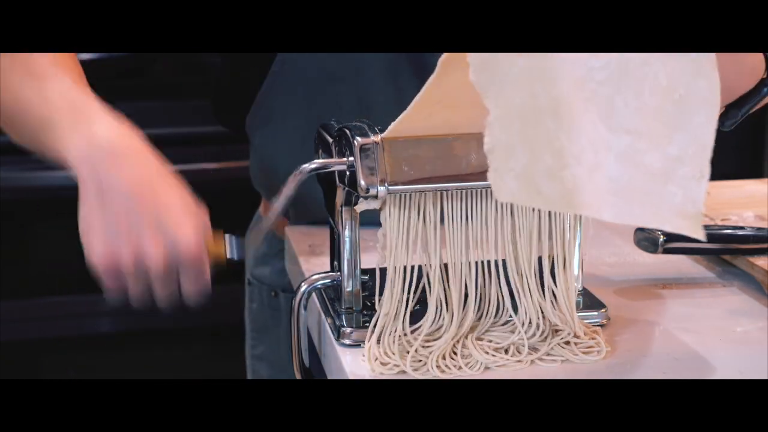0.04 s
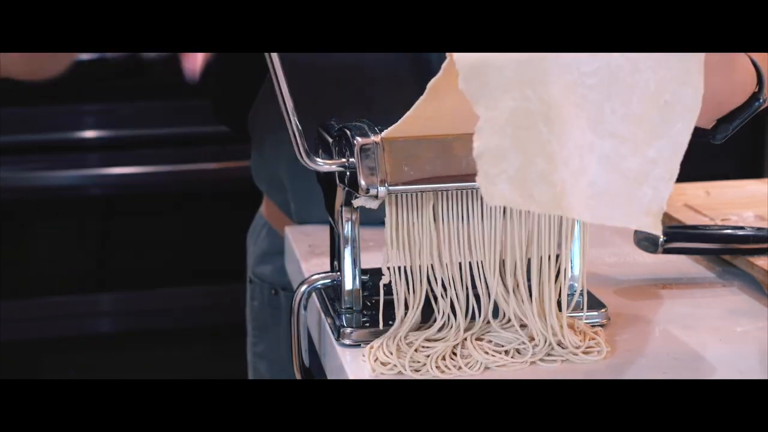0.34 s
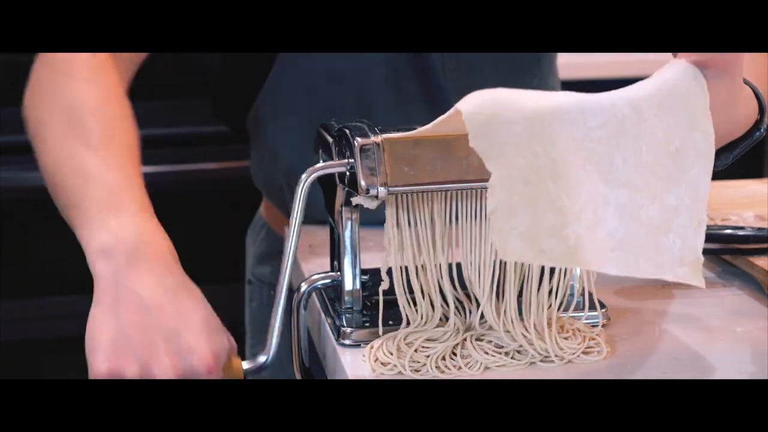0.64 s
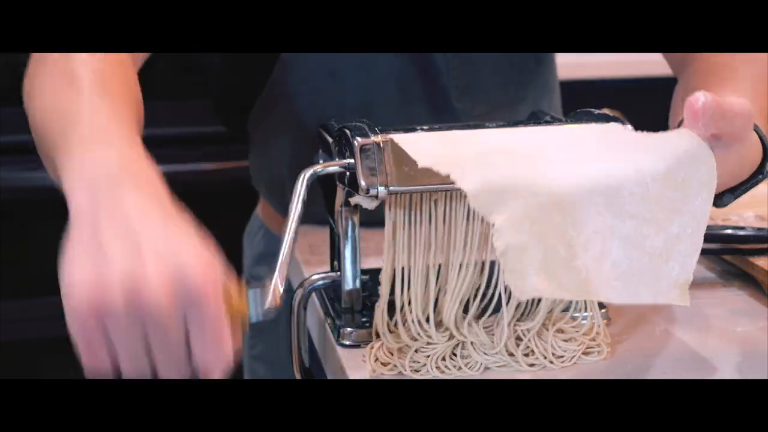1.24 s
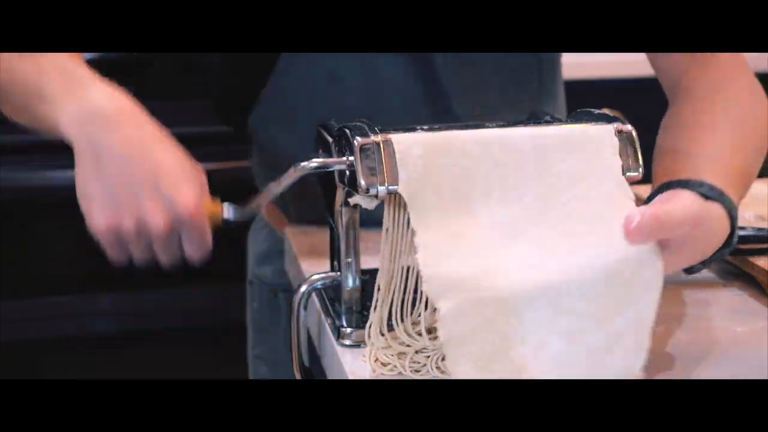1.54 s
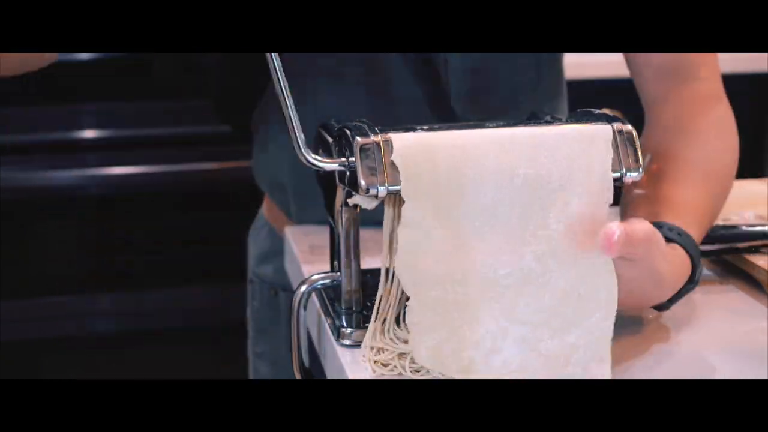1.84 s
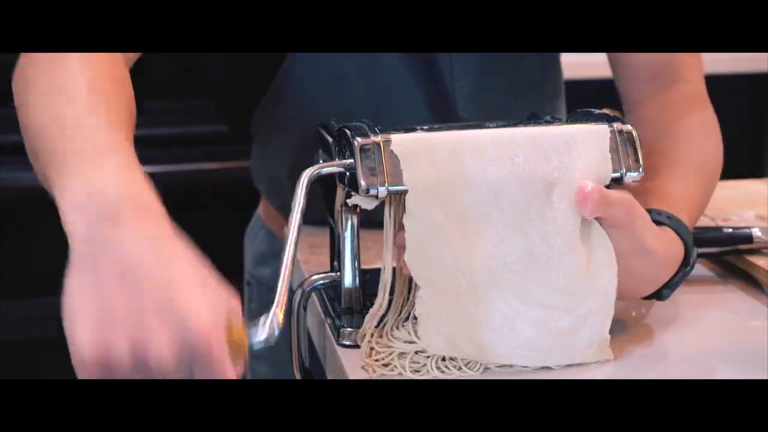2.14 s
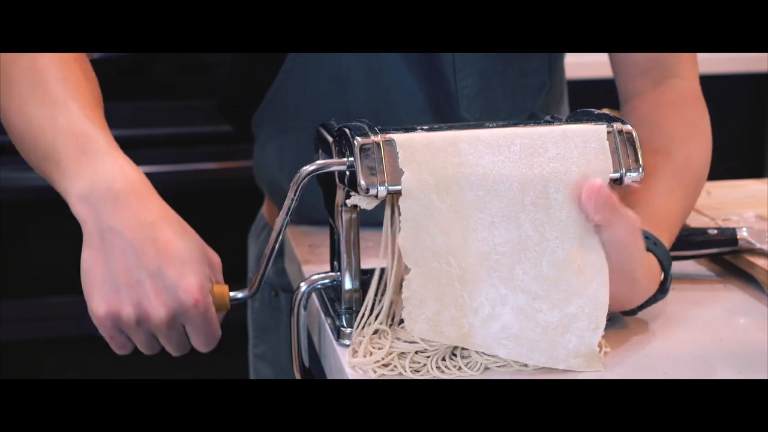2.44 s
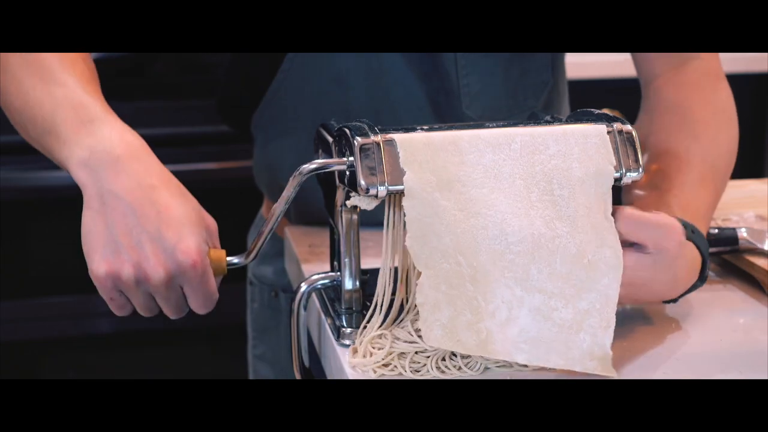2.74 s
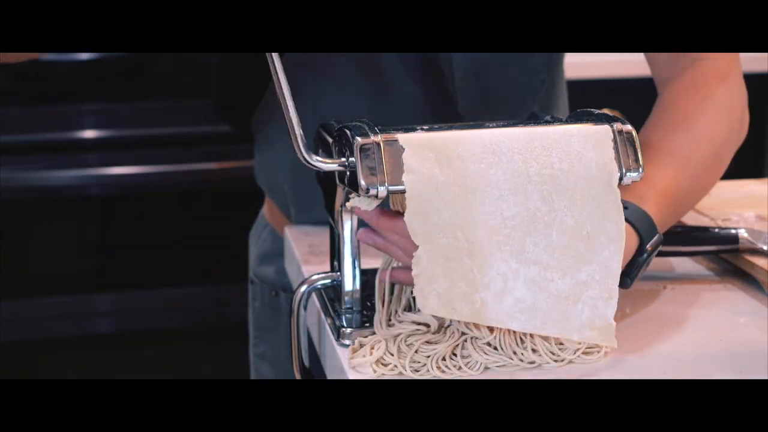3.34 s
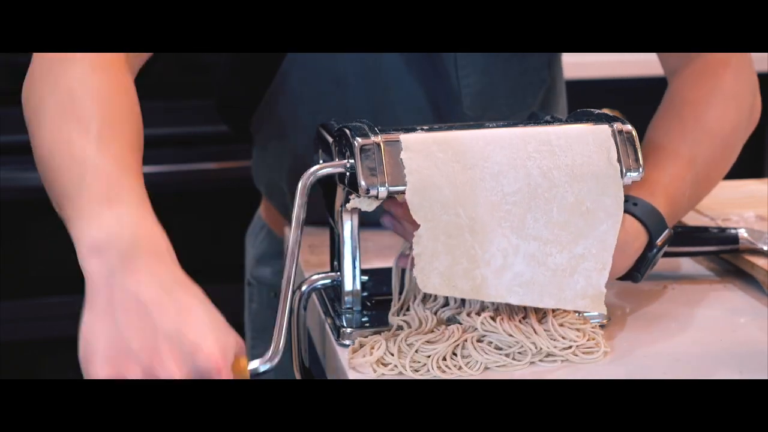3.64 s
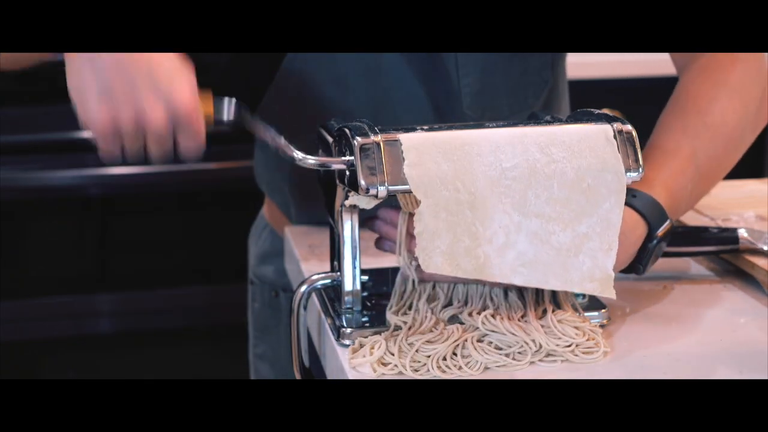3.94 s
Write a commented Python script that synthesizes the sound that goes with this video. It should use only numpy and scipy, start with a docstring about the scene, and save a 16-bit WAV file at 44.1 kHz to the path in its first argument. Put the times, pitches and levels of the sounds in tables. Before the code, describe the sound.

Gears of a steel pasta cutter rattle and clack unevenly, with light crank clinks.

```python
"""First you hear gears rumbling and knocking, close by: a hand-cranked steel pasta machine is cutting
a sheet of dough. The rollers ring, the dough hisses and ticks through the cutters, and the kitchen
counter booms under the load. The loose crank clinks in its socket and a dry bearing squeaks.
The hand rests briefly near 2.8 s, then turns the crank again."""
import sys
import numpy as np
from scipy import signal
from scipy.fft import rfft, irfft, next_fast_len
from scipy.io import wavfile
from scipy.ndimage import map_coordinates

SR = 44100
rng = np.random.default_rng(int(sys.argv[2]) if len(sys.argv) > 2 else 0)


def master(y):
    """Save y as 16-bit WAV."""
    cut = np.clip(np.atleast_2d(y).T, -1, 1)
    pcm = np.round(cut * 32767)  # scale
    wavfile.write(sys.argv[1], SR, pcm.astype(np.int16))


N = 4 * SR

# Levels in the tables are relative: the functions add an overall level for each sound.
# How loud each steady sound is over time: time_s, level_db
GEAR_EFFORT = [(0.0, -51), (0.22, -43.5), (0.34, -50), (0.6, -51.5), (0.79, -48), (0.93, -45.5),
               (1.14, -48), (1.29, -48.5), (1.51, -51), (1.88, -43), (2.03, -50.5), (2.22, -51),
               (2.39, -56.5), (2.71, -68.5), (2.96, -62), (3.12, -50), (3.27, -47.5), (3.33, -48),
               (3.5, -49), (3.64, -52.5), (3.87, -49.5), (4.0, -47)]
DOUGH_FEED = [(0, -61), (.2, -60), (.36, -62.5), (.47, -67), (.6, -62), (.72, -56), (.9, -66.5),
              (.99, -57.5), (1.22, -56.5), (1.38, -60), (1.56, -64), (1.68, -63), (1.8, -61.5),
              (1.95, -57.5), (2.04, -66), (2.17, -63), (2.33, -64.5), (2.55, -65), (2.63, -62.5),
              (2.73, -71.5), (2.86, -78), (3.0, -70.5), (3.12, -62.5), (3.23, -61.5), (3.39, -58.5),
              (3.45, -70), (3.66, -61.5), (3.73, -62), (3.88, -59.5), (4, -64.5)]
COUNTER_SWELLS = [(0, -54), (.08, -44), (.19, -66), (.28, -39.5), (.4, -55.5), (.54, -35), (.62, -50.5),
                  (.69, -43.5), (.8, -46), (.92, -56), (1.0, -49), (1.16, -48), (1.29, -36), (1.42, -47),
                  (1.66, -57), (1.8, -42), (1.93, -61), (2.1, -43), (2.33, -54.5), (2.42, -50), (2.55, -53),
                  (2.8, -64), (3.08, -63), (3.25, -48), (3.4, -51.5), (3.6, -39.5), (3.7, -46),
                  (3.86, -45.5), (4, -58)]

# Gear knocks and their five parts: start_s, casing_db, thud_db, frame_db, plate_db, clack_db
GEAR_KNOCKS = [(.033, -33, -29, -31.5, -35, -40.5), (.140, -50, -32.5, -35, -43, -69),
               (.187, -47, -34, -37.5, -48, -66), (.240, -39.5, -33, -26, -34, -44),
               (.307, -36, -41, -40, -45, -59), (.365, -33, -48, -37, -49.5, -69),
               (.568, -36.5, -33.5, -50, -36.5, -44.5), (.750, -25, -27, -42, -38.5, -38.5),
               (.796, -53, -30.5, -39.5, -46, -53), (.916, -42.5, -30, -35, -47.5, -72),
               (.972, -41, -27.5, -28.5, -45, -49.5), (1.038, -32, -38, -34, -43.5, -63),
               (1.099, -33.5, -50, -38, -44, -49.5), (1.279, -33, -34, -38, -35, -42),
               (1.467, -32, -28, -55, -45.5, -50), (1.773, -38, -29.5, -29, -38.5, -47),
               (1.849, -37.5, -63, -33, -48.5, -71), (1.992, -39.5, -36, -41.5, -42.5, -49),
               (2.072, -49, -36, -45, -56, -74), (2.078, -42, -51, -59, -43, -56),
               (2.154, -35.5, -35.5, -47.5, -37, -45), (2.39, -38, -31, -39.5, -45.5, -55.5),
               (2.512, -47.5, -51, -54, -58, -72), (2.569, -43.5, -35.5, -51, -58, -65),
               (3.161, -45, -39.5, -40, -51, -56), (3.235, -39, -38.5, -27.5, -41.5, -41.5),
               (3.324, -35, -50, -34.5, -47, -57.5), (3.402, -41, -50, -40, -40, -64),
               (3.475, -34.5, -46, -44, -40, -51), (3.549, -40, -39, -45.5, -49, -75),
               (3.624, -35.5, -34, -41, -37, -50.5), (3.818, -30, -30.5, -43, -47.5, -44.5),
               (3.893, -35.5, -59, -38, -47.5, -57), (3.984, -58, -52, -38, -51, -70)]
# Clinks of the crank: start_s, high_ring_db, low_ring_db
CRANK_CLINKS = [(0.0355, -30.5, -42), (0.2399, -34.5, -30.5), (0.493, -49, -50), (0.5048, -47, -52),
                (0.752, -28, -40.5), (1.2546, -39.5, -43.5), (1.2705, -41, -50), (1.28, -41.5, -42),
                (1.775, -48, -48), (1.9946, -34.5, -55), (2.013, -44, -53), (2.0469, -42, -50),
                (2.0775, -41, -49), (2.091, -37, -48.5), (2.0944, -34, -46), (2.1106, -42, -52.5),
                (3.478, -31.5, -44.5), (3.4974, -38, -49), (3.529, -45.5, -55), (3.556, -44, -54),
                (3.5696, -37.5, -47.5), (3.587, -38, -49), (3.606, -42, -48), (3.8177, -34.5, -48.5)]
# Dry ticks at the cutters: start_s, level_db, pitch_hz
CUTTER_TICKS = [(0.158, -34.5, 2720), (0.6285, -41, 3330), (0.871, -24.5, 2610), (1.447, -32, 2540),
                (1.5367, -37, 3140), (1.6327, -32.5, 2050), (1.7788, -27, 3070), (2.454, -45, 1640),
                (3.238, -30, 2020), (3.4057, -29.5, 2930), (3.8772, -38, 3700), (3.9848, -41, 1600)]
# Squeaks of the bearing: start_s, length_s, pitch_hz, level_db
BEARING_SQUEAKS = [(0.291, 0.015, 2875, -32.5), (0.309, 0.018, 2852, -31), (0.933, 0.022, 6940, -55),
                   (1.026, 0.024, 2760, -43.5), (3.936, .017, 3074, -41.5)]
# A squeak's tones at 1 to 5 times its pitch: level_db
SQUEAK_HARMONICS = [0, -15, -24, -29, -28]

# The notes each steel part rings with (a fade is the time to drop 60 dB): pitch_hz, level_db, fade_s
ROLLER_NOTES = [(1823, -6, .03), (2610, -2.5, 0.027), (2824, 1, 0.032), (2922, 3.5, 0.03), (3180, 0, 0.023),
                (3900, 1, 0.033), (4520, -2.5, .025), (5210, -2, 0.03), (6230, -3.5, 0.021),
                (7100, -1, 0.0099)]
FRAME_NOTES = [(236, 0, .11), (262, -8, .08), (311, -7, .25), (357, -5, .14), (432, -9, .08)]
CASING_NOTES = [(482, -6, .07), (615, -2, .035), (707, 0, .085)]
PLATE_NOTES = [(950, -21, 0.055), (1056, -6, 0.12), (1136.6, 0, 0.049), (1294, -20, 0.044)]
CRANK_HIGH_NOTES = [(8880, -6, .07), (10310, -1, .055), (10650, -4, .03), (11450, 2, .03), (12400, -2, .03),
                    (13970, 0, .04), (15150, -4, .04)]
CRANK_LOW_NOTES = [(3880, -2, .04), (4450, 1, .045), (5240, -5, .05), (6300, -5, .03), (6930, -1, .05)]

# The colour of each noise, or how strong it is from bass to treble: pitch_hz, level_db
GEAR_COLOUR = [(40, -41.5), (85, 6.5), (125, 10), (180, 0.5), (240, 2.5), (280, -0.5), (350, 5.5),
               (420, -4.5), (480, 0.5), (620, -7), (705, 0), (790, -18), (950, -11.5), (1100, -5.5),
               (1300, -22.5), (2200, -23.5), (5000, -79)]
DOUGH_COLOUR = [(500, -6), (1400, 7.5), (2300, -3.5), (3000, 5), (4000, 6.5), (5600, 1), (7000, 4),
                (7900, -1.5), (8700, 3), (11500, 1), (13000, 1), (15800, -3.5)]
COUNTER_COLOUR = [(25, -33), (42, -16), (53, -9.5), (61, -5), (69, -17), (80, -27), (120, -7), (200, -62.5)]
KITCHEN_COLOUR = [(20, -27), (40, 8), (60, -14), (120, -6.5), (180, -6.5), (350, -3), (550, -8.5),
                  (760, -4), (1000, -16.5), (1800, -23.5), (4000, -33), (9000, -25), (15500, -26)]
THUD_COLOUR = [(40, -40), (70, -18.5), (100, -4.5), (125, 1), (160, -3.5), (220, -15), (500, -31),
               (1500, -69)]
FRAME_COLOUR = [(80, -24), (170, -14), (240, -10), (400, 0), (500, -9), (700, -15), (1500, -72.5)]
CASING_COLOUR = [(250, -19), (480, -12.5), (720, -0.5), (800, -18), (1000, -13.5), (2000, -51.5)]
PLATE_COLOUR = [(600, -32.5), (850, -2.5), (1130, -1), (1300, -7), (1800, -12), (2300, -24.5), (4000, -32)]
CLACK_COLOUR = [(600, -47), (1500, -10), (2300, 4), (3100, 9), (4400, 11), (6500, -8), (8000, -5.5),
                (15000, -34)]
CRANK_HIGH_COLOUR = [(4000, -23), (8300, -10), (10300, 6), (10900, -8), (11500, 8), (13000, -3.5),
                     (14000, 2), (14700, -22), (15800, 0)]
CRANK_LOW_COLOUR = [(800, -6), (1800, 8), (4400, 7), (7200, 7), (8200, -3), (12000, -41)]
RASP_COLOUR = [(700, -15), (1900, 13), (2900, -13), (3700, 4), (4500, 8), (7000, 1), (12000, 6),
               (15800, -17)]
AFTER_RING_COLOUR = [(1500, 7), (2850, -9.5), (6000, -13.5), (15000, -17)]
# The colour of a tick around its own pitch: pitch_ratio, level_db
TICK_COLOUR = [(.2, -20), (.71, -7), (1, 0), (1.39, -11), (2.26, -17), (4, -32)]

# How long the kitchen's echo lasts: pitch_hz, fade_s
ECHO_FADES = [(100, 0.31), (700, 0.78), (3000, 0.19), (12000, 0.12)]

HIT_TIME = np.arange(11000) / SR  # seconds since a hit began


def amp(db):
    """Turn decibels into a number to multiply a sound by."""
    return 10 ** (np.asarray(db) / 20)


def unit(x):
    """Scale a sound to an average strength (rms) of 1."""
    return x / np.sqrt(np.mean(x ** 2) + 1e-20)


def at_pitch(rows, hz):
    """Read between (pitch_hz, value) rows, giving each octave equal room."""
    pitches, values = np.transpose(rows)
    return np.interp(np.log(hz + 1), np.log(pitches + 1), values)


def curve(rows):
    """Join (time_s, value) rows with straight lines, one value per sample."""
    return np.interp(np.arange(N) / SR, *np.transpose(rows))


def wobble(rate):
    """A smooth wander through `rate` random values a second."""
    return map_coordinates(rng.standard_normal(2048), [np.arange(N) * rate / SR], mode="wrap")


def coloured(x, colour):
    """Give a sound this balance of bass and treble, at strength 1."""
    size = len(x)
    gains = amp(at_pitch(colour, np.fft.rfftfreq(size, 1 / SR)))
    cepstrum = irfft(np.log(gains), size)
    # Folding this onto its first half makes the filter ring after a hit, not before.
    cepstrum[1:size // 2] *= 2
    cepstrum[size // 2 + 1:] = 0
    return unit(irfft(rfft(x) * np.exp(rfft(cepstrum)), size))


def add(track, start_s, sound):
    """Mix a sound into the track at start_s."""
    i = max(0, round(start_s * SR))
    track[i:i + len(sound)] += sound[:N - i]


def fade(t, fade_s):
    """Die away by 60 dB every fade_s seconds."""
    return np.exp(-np.log(1000) * t / fade_s)


def burst(colour, rise_s, fade_s):
    """Many crowded notes struck together: noise that swells and dies."""
    noise = coloured(rng.standard_normal(len(HIT_TIME)), colour)
    return noise * np.minimum(HIT_TIME / rise_s, 1) * fade(np.maximum(HIT_TIME - rise_s, 0), fade_s)


def ring(notes, rise_s, spread_db=3, detune=.008):
    """Clear notes, struck a little differently every time; the load shifts their pitch slightly."""
    hz, db, fade_s = np.transpose(notes)[:, :, None]
    gain = amp(db + spread_db * rng.standard_normal(hz.shape))
    hz = hz * (1 + detune * rng.uniform(-1.23, 1, hz.shape))
    waves = np.sin(2 * np.pi * (hz * HIT_TIME + rng.random(hz.shape))) * fade(HIT_TIME, fade_s)
    chord = (gain * waves).sum(0) / np.sqrt(np.sum(gain ** 2) / 2)
    return chord * np.minimum(HIT_TIME / rise_s, 1)


def grains(rate, spread_db):
    """Tiny random clicks of uneven size, about `rate` a second."""
    clicks = (rng.random(N) < rate / SR) * rng.choice([-1, 1], N)
    return unit(clicks * amp(spread_db * np.clip(rng.standard_normal(N), -2, 2)))


def gear_rumble():
    """Small contacts of the turning gears and rollers rumble in the frame."""
    contacts = grains(rate=220, spread_db=3.5) + amp(1.5) * rng.standard_normal(N)
    level_db = curve(GEAR_EFFORT) + 1.5 + 1.26 * wobble(22.35)
    return amp(level_db) * coloured(contacts, GEAR_COLOUR)


def roller_ring():
    """The steel cutter rollers rub and ring, louder the harder the gears turn."""
    rubbing = unit(rng.standard_normal(N) + grains(rate=140, spread_db=4))
    steel = unit(signal.fftconvolve(rubbing, ring(ROLLER_NOTES, rise_s=.00011))[:N])
    level_db = curve(GEAR_EFFORT) - 17.5 + .32 * wobble(14)
    return amp(level_db) * steel


def dough_hiss():
    """The sheet hisses as it slides over steel, and tiny tears crackle as it parts into strands."""
    tear = burst(DOUGH_COLOUR, rise_s=.0003, fade_s=.008)
    crackle = unit(signal.fftconvolve(grains(rate=380, spread_db=5), tear)[:N])
    hiss = coloured(rng.standard_normal(N), DOUGH_COLOUR)
    level_db = curve(DOUGH_FEED) - .5 + 1.05 * wobble(29.17)
    return amp(level_db) * unit(hiss + amp(-5) * crackle)


def counter_boom():
    """The counter top booms on one low, wavering note under the clamped machine."""
    pitch_hz = 61 + 6 * wobble(16)
    hum = np.sqrt(2) * np.sin(2 * np.pi * np.cumsum(pitch_hz) / SR)
    rumble = coloured(rng.standard_normal(N), COUNTER_COLOUR)
    return amp(curve(COUNTER_SWELLS)) * unit(hum + amp(-1.5) * rumble)


def kitchen_hush():
    """The faint, steady noise of the quiet kitchen."""
    return amp(-65) * coloured(rng.standard_normal(N), KITCHEN_COLOUR)


def gear_knocks(rise_s=.004):
    """Gear teeth take up their slack and clack: the base thuds; frame, casing and cover plate ring."""
    out = np.zeros(N)
    for start_s, casing_db, thud_db, frame_db, plate_db, clack_db in GEAR_KNOCKS:
        thud = burst(THUD_COLOUR, rise_s, fade_s=.076)
        frame = ring(FRAME_NOTES, rise_s) + .5 * burst(FRAME_COLOUR, rise_s, fade_s=.073)
        casing = amp(-1.5) * ring(CASING_NOTES, rise_s)
        casing += amp(-3) * burst(CASING_COLOUR, rise_s, fade_s=.076)
        plate = burst(PLATE_COLOUR, rise_s, fade_s=.05) + amp(.5) * ring(PLATE_NOTES, rise_s)
        clack = burst(CLACK_COLOUR, rise_s=.0021, fade_s=.046)
        body = amp(thud_db - 3.5) * thud + amp(frame_db - 2.5) * frame + amp(casing_db - 2) * casing
        add(out, start_s, body + amp(plate_db - 1.5) * plate + amp(clack_db - 2) * clack)
    return out


def crank_clinks():
    """The loose steel crank shifts in its socket: each shift is a cluster of tiny uneven contacts."""
    out = np.zeros(N)
    for start_s, high_db, low_db in CRANK_CLINKS:
        chatter = unit(amp(2.2 * wobble(700)))[:len(HIT_TIME)]
        high = chatter * burst(CRANK_HIGH_COLOUR, rise_s=.0039, fade_s=.031)
        high += amp(-1.5) * ring(CRANK_HIGH_NOTES, rise_s=.0023)
        low = chatter * burst(CRANK_LOW_COLOUR, rise_s=.0016, fade_s=.042)
        low += amp(-.5) * ring(CRANK_LOW_NOTES, rise_s=.0031)
        add(out, start_s, amp(high_db - 6.5) * high + amp(low_db - 2) * low)
    return out


def cutter_ticks():
    """The dough makes short dry snaps at the cutters, each around its own pitch."""
    out = np.zeros(N)
    for start_s, level_db, pitch_hz in CUTTER_TICKS:
        colour = [(pitch_hz * ratio, db) for ratio, db in TICK_COLOUR]
        add(out, start_s, amp(level_db - 7.5) * burst(colour, rise_s=.00096, fade_s=.022))
    return out


def bearing_squeaks(jitter=.027, sag_hz_per_s=9000, flutter_db=2.5):
    """A dry bearing sticks and slips in a shaky, falling, raspy tone; the rollers ring on after it."""
    out = np.zeros(N)
    rasp = amp(-19) * coloured(rng.standard_normal(N), RASP_COLOUR)
    for start_s, length_s, pitch_hz, level_db in BEARING_SQUEAKS:
        progress = np.clip((np.arange(N) / SR - start_s) / length_s, 0, 1)
        sounding = (progress > 0) & (progress < 1)
        hz = pitch_hz * (1 + jitter * wobble(800)) - sag_hz_per_s * length_s * (progress - .5)
        phase = 2 * np.pi * np.cumsum(hz)[sounding] / SR
        tone = sum(amp(db) * np.sin(k * phase) for k, db in enumerate(SQUEAK_HARMONICS, 1))
        flutter = amp(flutter_db * wobble(400)[sounding])
        swell = np.sin(np.pi * progress[sounding])
        out[sounding] += amp(level_db) * swell * (tone * flutter + rasp[sounding])
    after_ring = burst(AFTER_RING_COLOUR, rise_s=.005, fade_s=1)
    return out + amp(-19) * signal.fftconvolve(out, after_ring / np.linalg.norm(after_ring))[:N]


def with_close_echoes(x, count=12, latest_s=.014):
    """The sound plus its treble bouncing back off the counter and the steel plates."""
    treble = signal.sosfilt(signal.butter(2, 1500, "high", fs=SR, output="sos"), x)
    echoes = np.zeros(N)
    for delay_s, sign in zip(rng.uniform(.0008, latest_s, count), rng.choice([-1, 1], count)):
        add(echoes, delay_s, sign * treble / np.sqrt(count))
    return x + amp(-10) * echoes


def kitchen_echo(x):
    """The kitchen's short echo, each pitch dying at its own speed."""
    hz, t, noise = signal.stft(rng.standard_normal(SR // 2), SR, nperseg=256)
    fading = noise * fade(t, at_pitch(ECHO_FADES, hz)[:, None])
    tail = signal.istft(fading, SR, nperseg=256)[1]
    delayed = np.pad(x, (300, 0))
    return signal.fftconvolve(delayed, tail / np.linalg.norm(tail))[:N]


def scene():
    """The machine in the quiet kitchen; only a faint echo sets the left and right ears apart."""
    turning = gear_rumble() + roller_ring() + dough_hiss()
    background = counter_boom() + kitchen_hush()
    hits = gear_knocks() + crank_clinks() + cutter_ticks()
    squeaks = bearing_squeaks()
    centre = with_close_echoes(turning + hits) + squeaks + background
    centre += amp(-13) * kitchen_echo(hits + squeaks)
    side = amp(-41) * kitchen_echo(centre)
    return np.array([centre + side, centre - side])


def record(dry, low_cut_hz=52.4, top_hz=15850):
    """Turn down the deepest bass and remove the very highest treble."""
    size = next_fast_len(N + SR // 2)
    hz = np.fft.rfftfreq(size, 1 / SR)
    bass_cut = hz ** 4 / np.hypot(hz ** 4, low_cut_hz ** 4)
    return irfft(rfft(dry, size) * (hz < top_hz) * bass_cut, size)[:, :N]


dry = scene()
out = record(dry)
master(out)
```